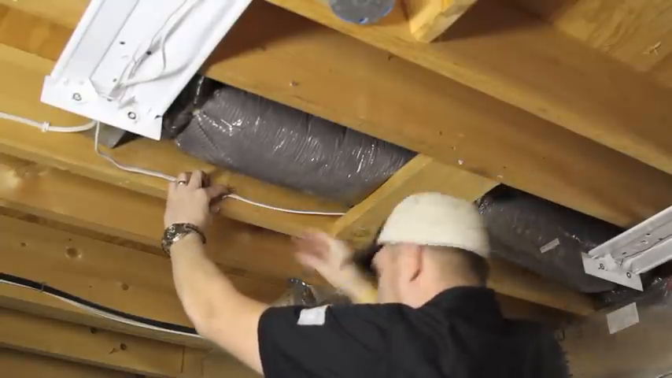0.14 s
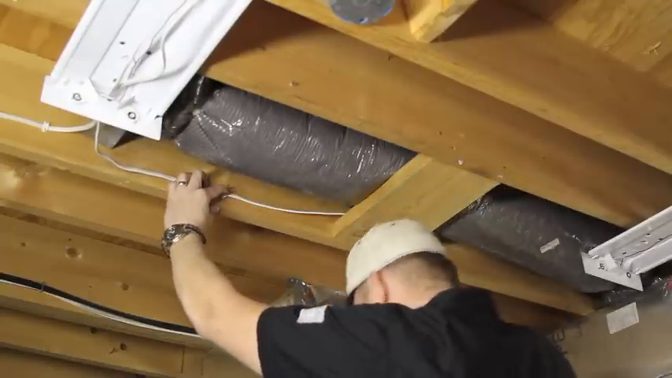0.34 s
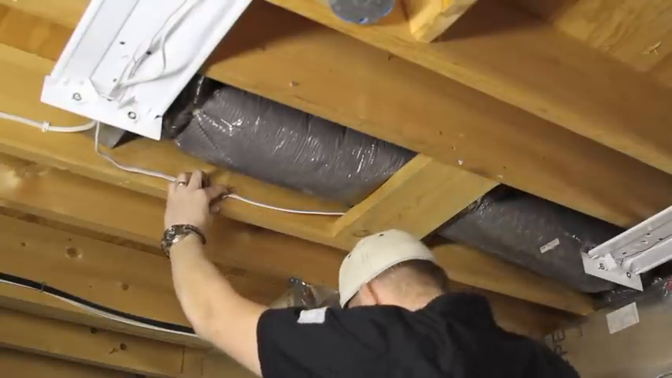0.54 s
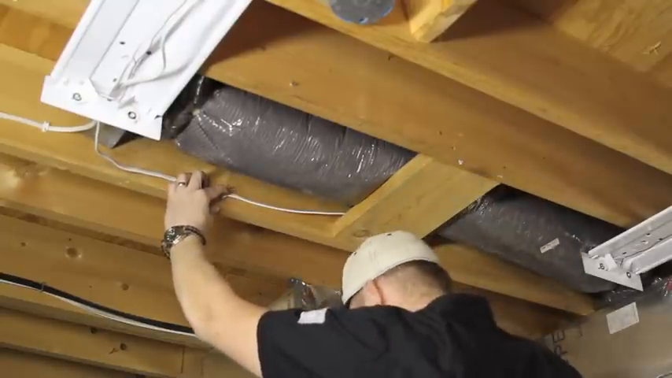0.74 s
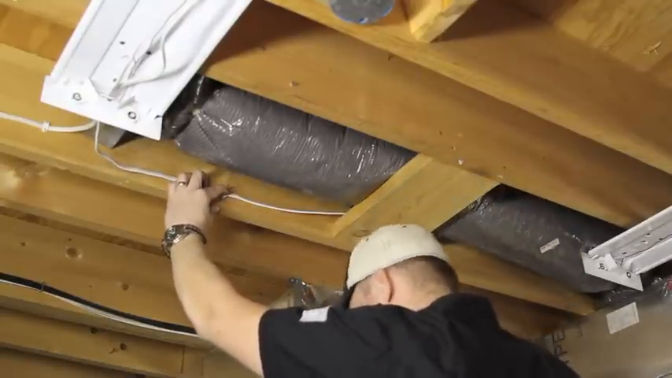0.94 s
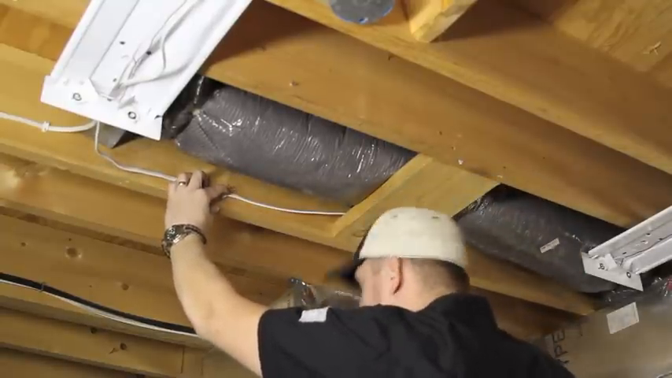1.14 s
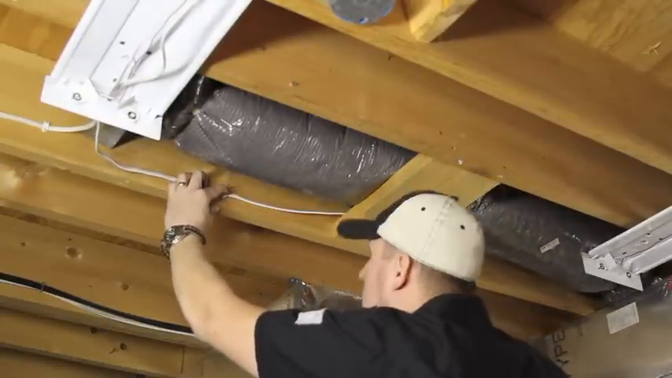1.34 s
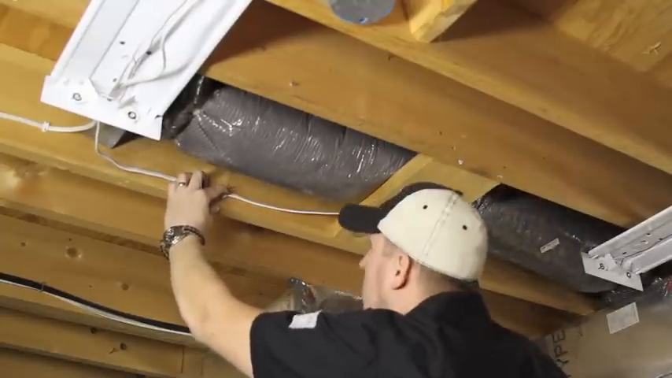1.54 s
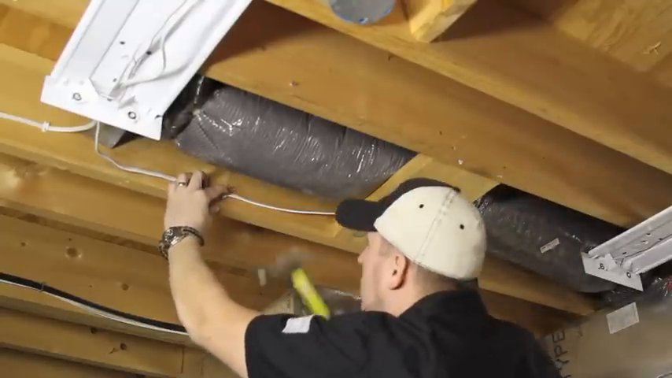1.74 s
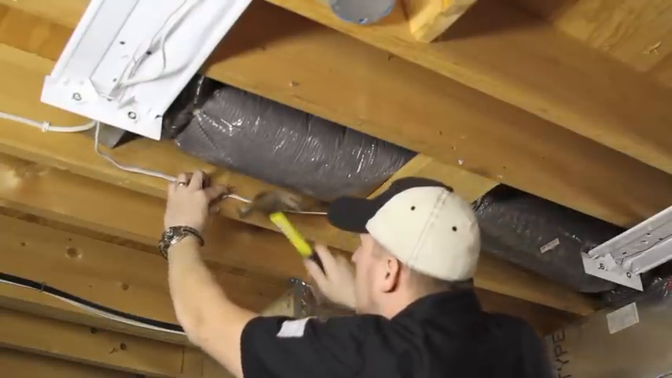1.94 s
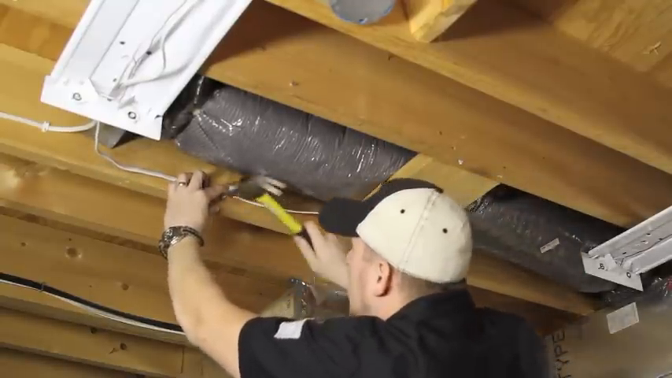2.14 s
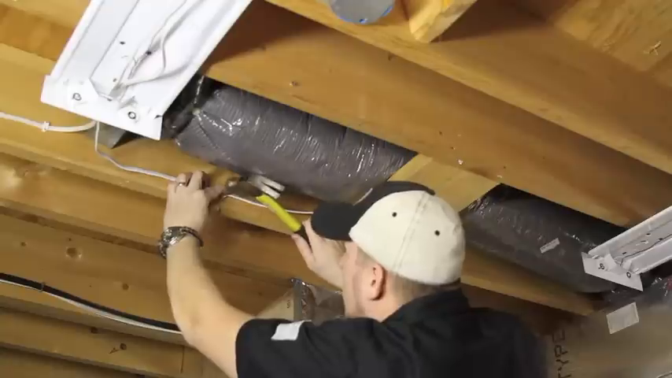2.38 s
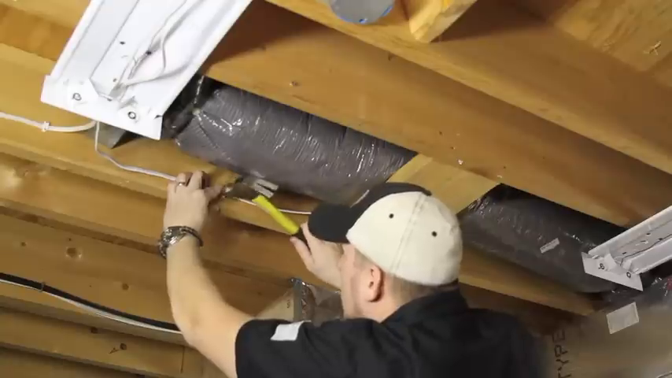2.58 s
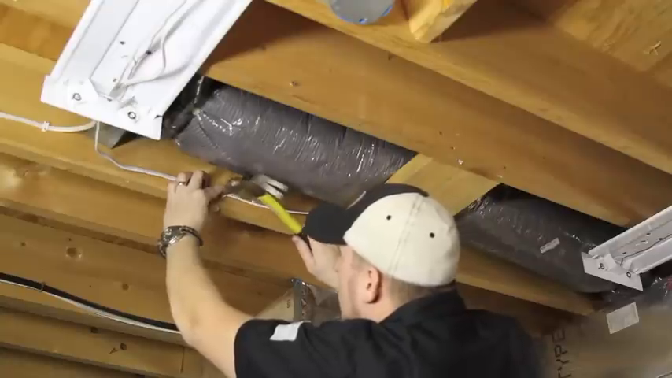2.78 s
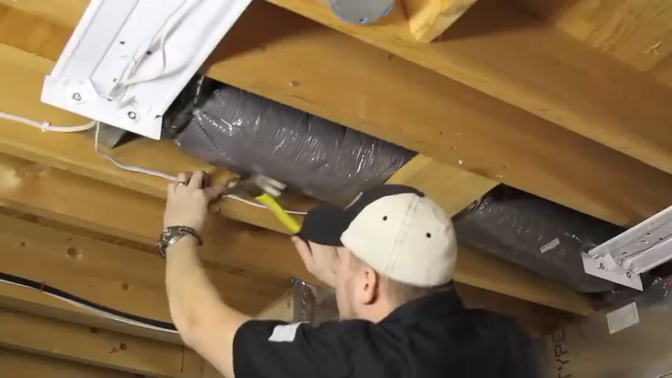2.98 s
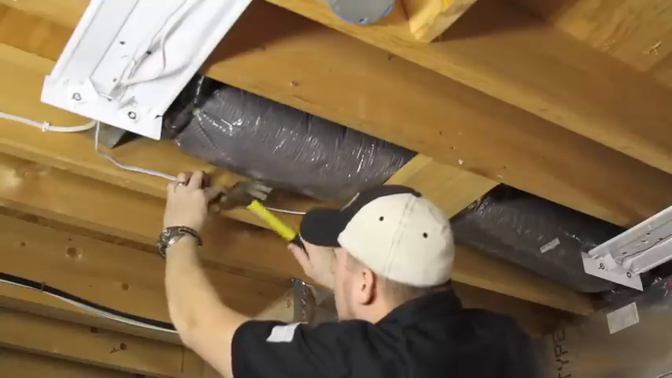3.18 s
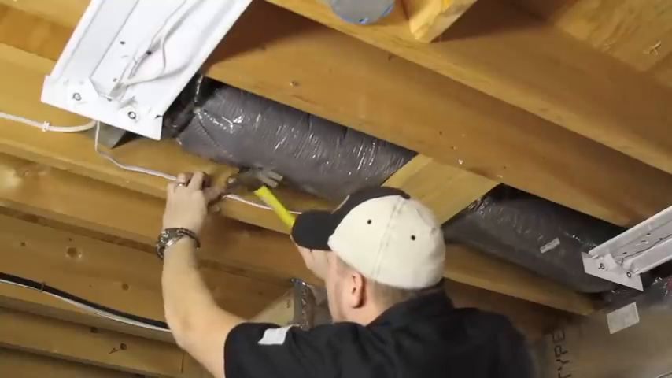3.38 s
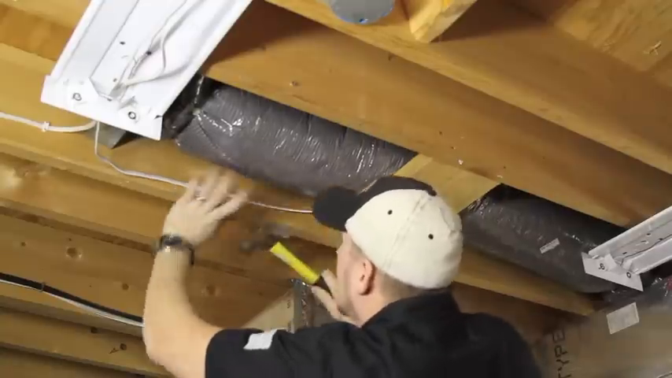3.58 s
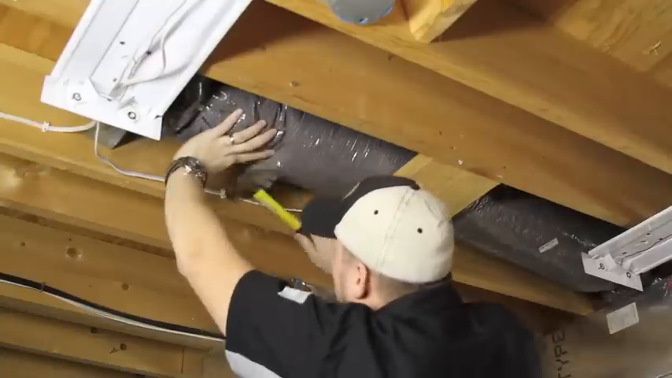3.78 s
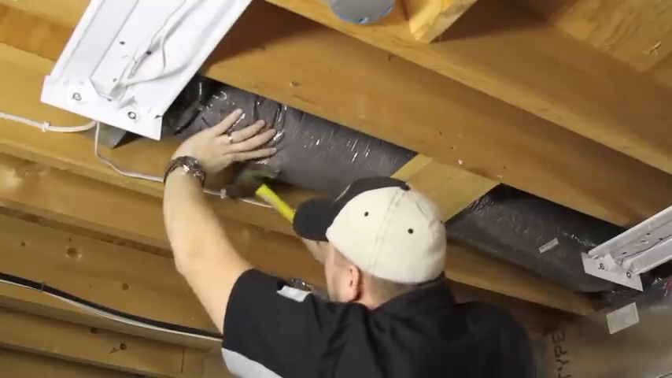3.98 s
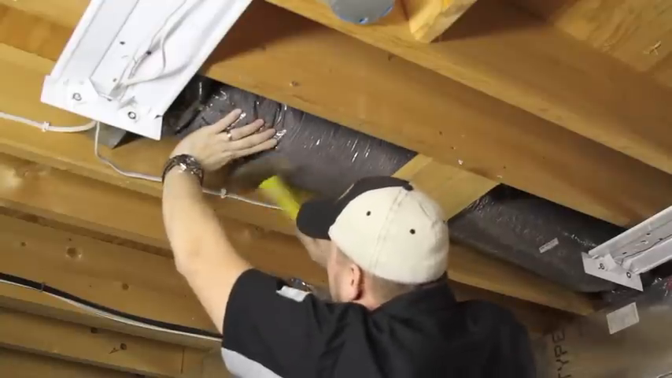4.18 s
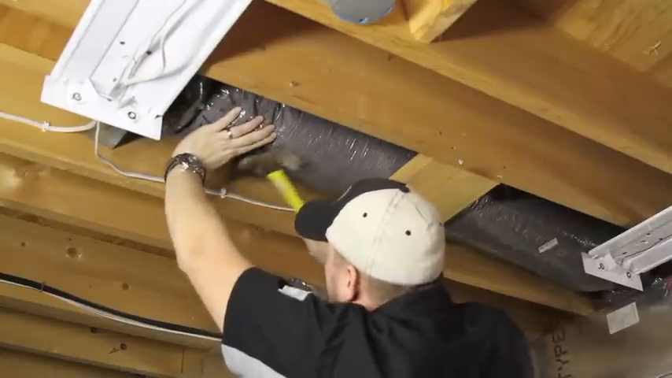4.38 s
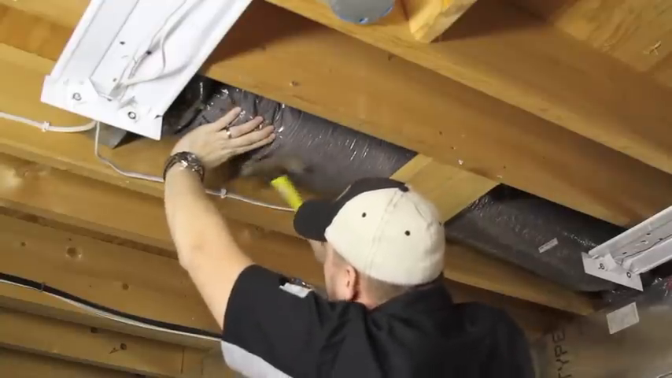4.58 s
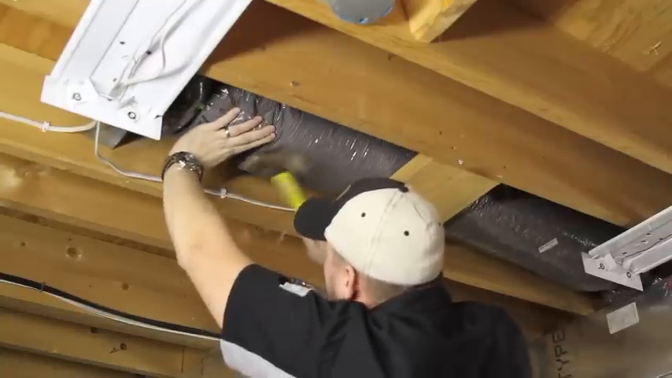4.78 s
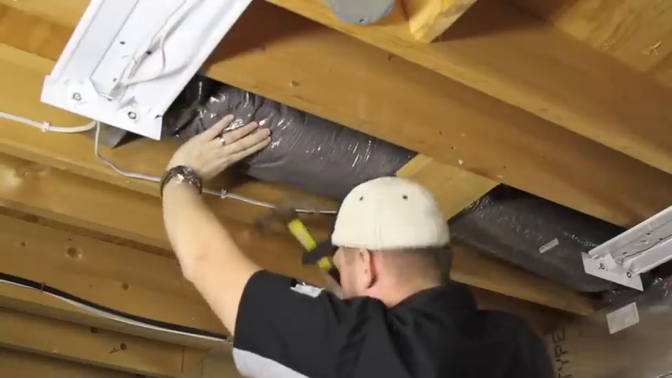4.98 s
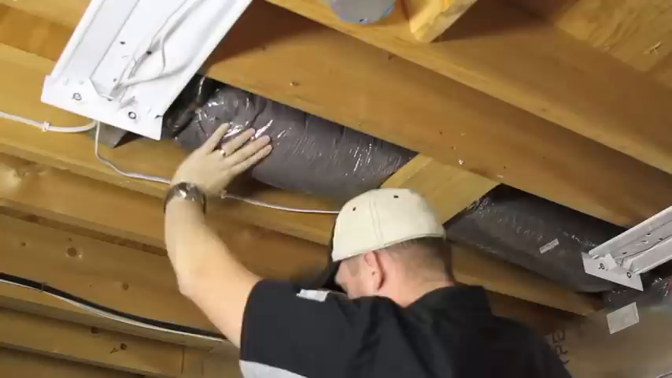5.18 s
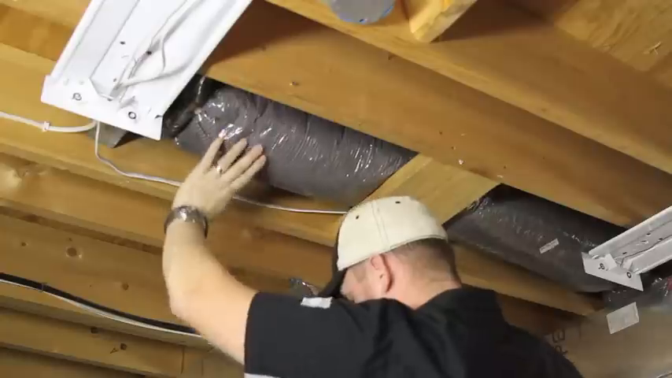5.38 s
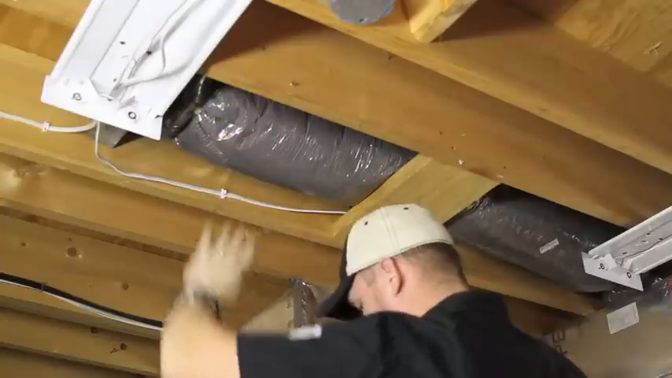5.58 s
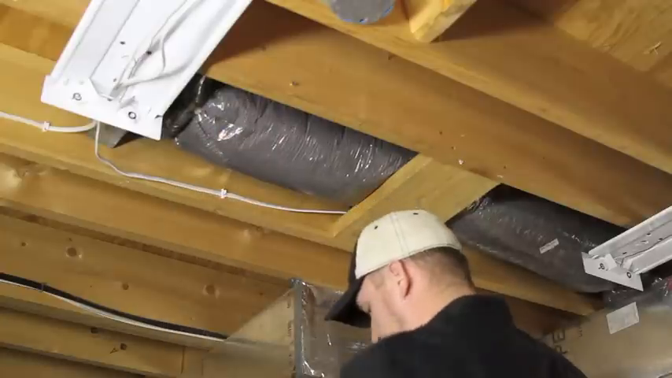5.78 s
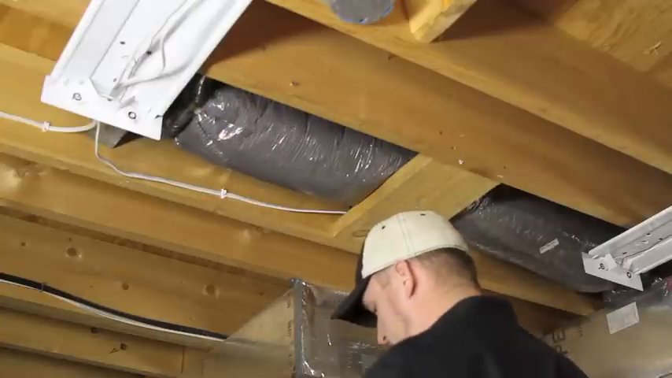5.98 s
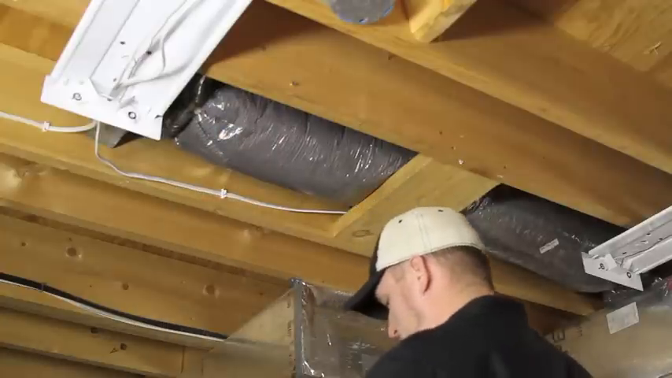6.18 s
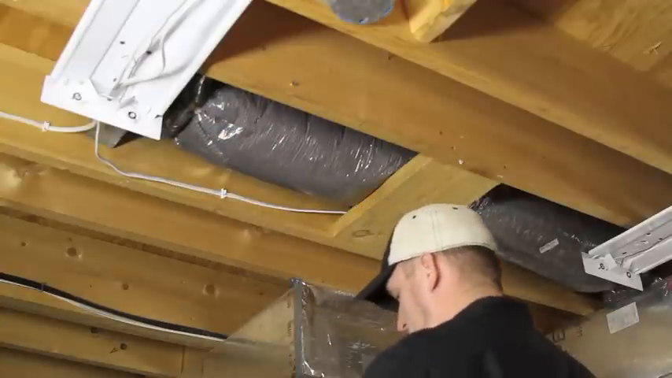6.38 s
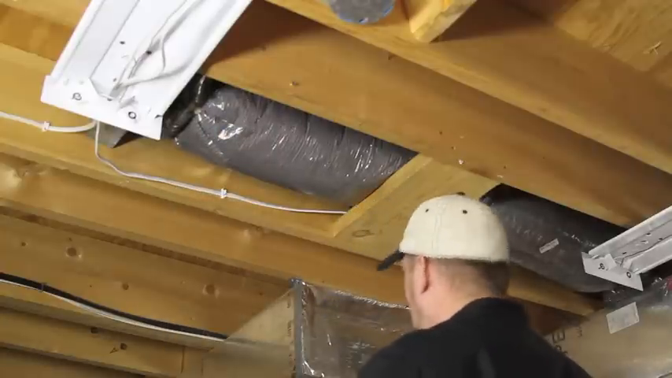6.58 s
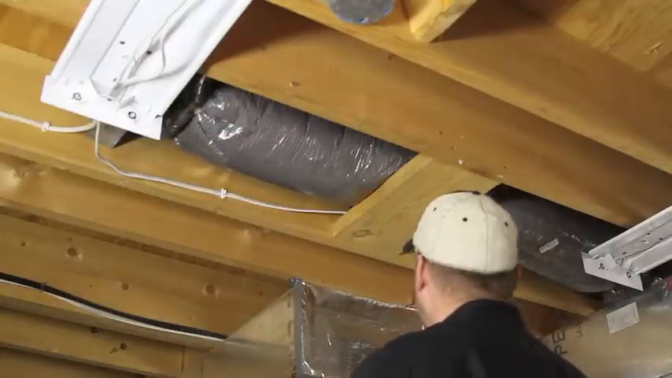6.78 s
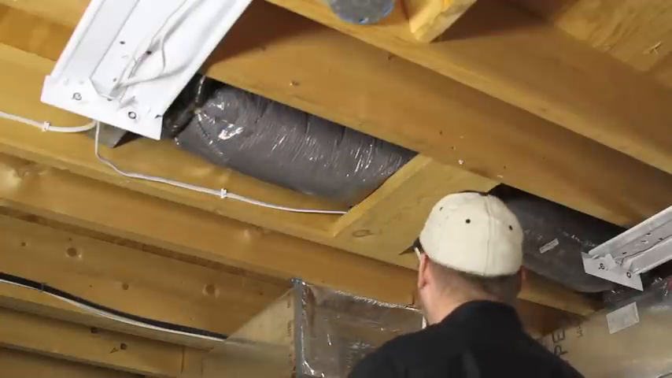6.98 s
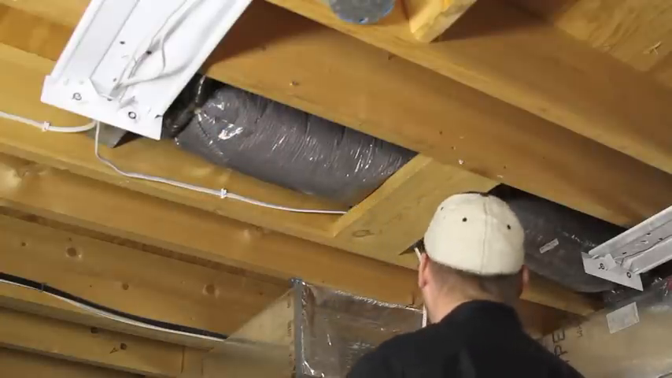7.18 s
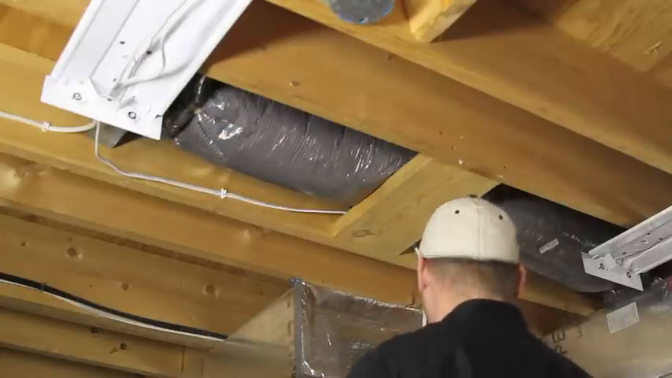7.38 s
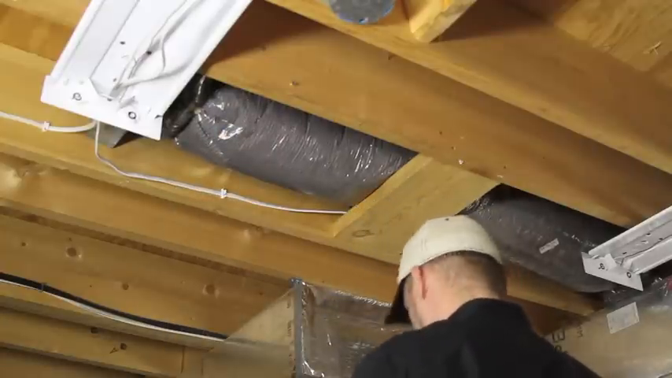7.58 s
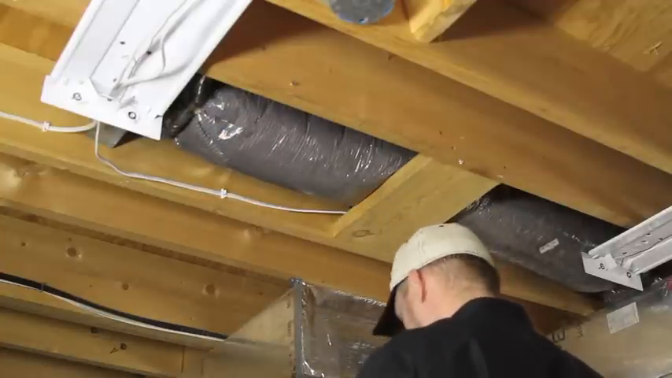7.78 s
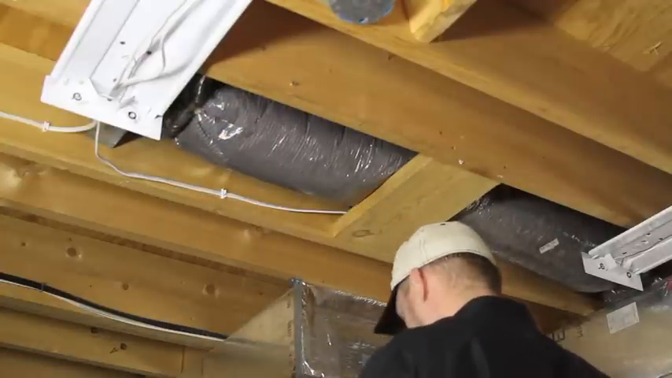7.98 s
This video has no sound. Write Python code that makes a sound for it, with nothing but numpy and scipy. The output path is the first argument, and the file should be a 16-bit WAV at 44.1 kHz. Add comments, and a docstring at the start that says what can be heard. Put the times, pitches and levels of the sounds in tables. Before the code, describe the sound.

Close-to-medium pickup in an unfinished basement with soft ventilation. Three solid hammer knocks with a steel snap, about a third of a second apart, turn into a rattling run of thin, sped-up taps with a short gap early on. Normal air returns, ducked at first, with slight creaks and foil rustle. A hammer drops onto a ladder top in a quick double clack, the ladder rattles, and small clicks and scrapes remain.

```python
"""A hammer drives a cable staple into a basement ceiling joist: three blows, then a faster, higher time-lapse run.
Each blow is damped joist modes, board noise, room echo, a steel snap and a hum of the floor above.
The hammer clanks onto a stepladder: noise knocks and a steel ring. The ladder scrapes, creaks and rocks in
resonant noise and wavering tones. Sleeve and foil rustle as noise strokes and grains; sped-up room tone fills
the run. Ventilation is noise: air rush, fan resonances and hiss."""
import sys
import numpy as np
from scipy.fft import rfft, irfft, next_fast_len
from scipy.io import wavfile
from scipy.ndimage import map_coordinates

SR = 44100
rng = np.random.default_rng(int(sys.argv[2]) if len(sys.argv) > 2 else 0)


def log_audio(samples):
    """Write samples as a 16-bit WAV file to the path given in sys.argv[1]."""
    # one column per channel
    frames = np.atleast_2d(samples).T
    # limit to full scale, then quantise
    limited = np.clip(frames, -1, 1)
    pcm = np.round(limited * 32767).astype(np.int16)
    wavfile.write(sys.argv[1], SR, pcm)


N = 354563  # samples
TOP_HZ = 16000


def amp(db):
    """Decibels to gain."""
    return 10 ** (np.asarray(db) / 20)


def unit(x):
    """Scale to rms 1."""
    return x / np.sqrt(np.mean(x ** 2) + 1e-20)


def along(points, hz):
    """Read (freq_hz, value) points on a log axis."""
    f, v = np.transpose(points)
    return np.interp(np.log(hz + 1), np.log(f + 1), v)


def level(rows, peak_share, curve):
    """Gain per sample for (start_s, length_s, level_db) strokes: each swells and dies away."""
    t = np.arange(N) / SR
    stages = np.array([0, np.clip(peak_share, .05, .95), 1])
    gain = 0
    for start_s, length_s, level_db in rows:
        swell = np.interp(t, start_s + length_s * stages, [0, 1, 0])
        gain = gain + amp(level_db) * swell ** abs(curve)
    return gain


def filtered(x, response):
    """Multiply the spectrum of x by a response of frequency."""
    m = next_fast_len(len(x) + 8192)
    return irfft(rfft(x, m) * response(np.fft.rfftfreq(m, 1 / SR)), m)[:len(x)]


def noise(spectrum, size=N, speed=1):
    """Noise of rms 1 with a spectrum that speed shifts upward."""
    return unit(filtered(rng.standard_normal(size), lambda hz: amp(along(spectrum, hz / speed))))


def resonant_noise(peaks):
    """Noise of rms 1 ringing in resonances of alternating sign."""
    def body(f):
        total = 0
        for k, (centre, width, db) in enumerate(peaks):
            resonance = 1j * f * width / (centre * centre - f * f + 1j * f * width)
            total = total + (-1) ** k * amp(db) * resonance
        return total

    # the extra power sharpens the peaks
    return unit(filtered(rng.standard_normal(N), lambda f: body(f) * np.abs(body(f)) ** (1 / 4)))


def ripple(x, spacing_hz, depth_db):
    """Reflections leave irregular peaks and dips across the spectrum."""
    knots = rng.standard_normal(int(SR / spacing_hz))
    return filtered(x, lambda hz: amp(depth_db * map_coordinates(knots, [hz / spacing_hz])))


def ring(modes, t, scatter_db):
    """Damped modes that start together, their strengths scattered by scatter_db."""
    total = 0
    for hz, db, t60_s in modes:
        decay = amp(db + scatter_db * rng.standard_normal() - 60 * t / t60_s)
        total = total + decay * np.sin(2 * np.pi * hz * t)
    return total


def add(track, s, sound):
    """Mix a sound in at time s."""
    start = round(s * SR)
    track[start:start + len(sound)] += sound[:N - start]


# room decay, at speed 1: freq_hz, t60_s
ROOM_DECAY = [(100, 0.73), (250, 0.45), (600, 0.39), (2000, 0.3), (6000, 0.41), (15000, 0.15)]


def reverberant(spectrum, t, speed=1):
    """Diffuse sound whose every band dies at the room's own rate."""
    source = noise(spectrum, size=len(t), speed=speed)
    centres = [hz for hz, _ in ROOM_DECAY]
    total = 0
    for share, (_, t60_s) in zip(np.eye(len(ROOM_DECAY)), ROOM_DECAY):
        points = list(zip(centres, share))
        band = filtered(source, lambda hz: along(points, hz / speed))
        total = total + band * amp(-60 * t / t60_s)
    return total


# joist with its staple, at speed 1: freq_hz, level_db (relative), t60_s
JOIST_MODES = [(115.1, -32, 1), (141.5, -29, 0.69), (189.3, -10, 0.12), (230.3, -11.5, 0.29),
               (323, -21, 0.35), (359, -5.5, 0.065), (389, -7.5, 0.11), (561.3, -1.5, 0.079),
               (606, 1, 0.035), (624, -2.5, 0.073), (844, -17, 0.082), (1082, -11, 0.06),
               (1275, -16.5, 0.087), (1782, -17, 0.083), (2880, -12, 0.05)]
# ceiling boards, at speed 1: freq_hz, level_db (relative, per Hz)
BOARD_SPECTRUM = [(30, -27.5), (62, -9), (95, -13), (140, -5), (230, 2.5), (450, -6.5), (580, -1),
                  (780, -14.5), (1200, -11.5), (1750, -15), (2300, -20), (2900, -17.5), (4500, -25.5),
                  (8500, -35), (16000, -21.5)]
# steel on steel, at speed 1: freq_hz, level_db (relative, per Hz)
STAPLE_SPECTRUM = [(300, -15), (1200, 4), (4000, 1), (9000, -6), (13500, 4), (16000, -3.5)]
# hum of the floor above, at speed 1: freq_hz, level_db (relative, per Hz)
FLOOR_HUM_SPECTRUM = [(45, -52), (60, -15), (85, -31), (105, -20.5), (122, -1.5), (140, 0), (165, -15),
                      (300, -71)]
FLOOR_T60_S = 0.85  # at speed 1


def hammering(rows, speed, boards_db, boards_t60_s, room_db, steel_db, steel_t60_s, rise_s,
              spot_hz, spot_db, boom_db, body_db, hum_db):
    """Each blow rings the joist, shakes the boards and fills the room; speed scales time and pitch."""
    t = np.arange(int(SR / speed)) * speed / SR  # unscaled time: t60 and rise settings refer to it

    def boards():
        direct = amp(boards_db - 60 * t / boards_t60_s) * noise(BOARD_SPECTRUM, len(t), speed)
        return direct + amp(room_db) * reverberant(BOARD_SPECTRUM, t, speed)

    modes = [mode for mode in JOIST_MODES if mode[0] * speed < TOP_HZ]
    shared = boards()  # part of the echo is common to all these blows
    track = np.zeros(N)
    for s, db, thud_db, crack_db in rows:
        joist = ring(modes, t * (1 + 0.011 * rng.standard_normal()), scatter_db=2)
        wood = (joist + shared / 2 + boards() * np.sqrt(3) / 2) * (1 - np.exp(-t / rise_s))
        # the snap has no onset ramp, so it leads the wood
        snap = amp(steel_db - 60 * t / steel_t60_s) * noise(STAPLE_SPECTRUM, len(t), speed)
        colour = [(130, thud_db / 2 + boom_db), (200, thud_db + body_db), (280, thud_db + body_db),
                  (480, 0.0043), (700, 0), (950, crack_db), (5000, crack_db), (11000, 0)]
        blow = filtered(wood + snap, lambda hz: amp(along(colour, hz / speed)))
        blow = ripple(blow, spot_hz, spot_db)  # no two blows land on quite the same spot
        blow = blow / np.sqrt(np.mean(blow[t < 1 / 50] ** 2))
        hum = amp(hum_db - 60 * t / FLOOR_T60_S) * noise(FLOOR_HUM_SPECTRUM, len(t), speed)
        hum = hum * (1 - np.exp(-t / 0.035))
        add(track, s, amp(db) * (blow + hum))
    return track


# first blows: start_s, level_db, thud_db, crack_db
FIRST_BLOWS = [(2.5609, -16.0, 2, -4), (2.8829, -12, 0.5, 0.5), (3.169, -12.0, 2.5, 3.5)]


def first_blows():
    """Three blows of hammer on staple, near natural speed."""
    return hammering(FIRST_BLOWS, 0.97, boards_db=-4.5, boards_t60_s=0.071, room_db=-15,
                     steel_db=-4.5, steel_t60_s=0.022, rise_s=0.0031, spot_hz=110.6, spot_db=1.5,
                     boom_db=-0.5, body_db=-2, hum_db=-19.0)


# time-lapse blows: start_s, level_db (relative within the run), crack_db
LAPSE_BLOWS = [(3.3006, -19.5, -4), (3.3329, -13.5, 4.5), (3.3644, -14, 4), (3.399, -13.5, 6),
               (3.4378, -14.5, 5), (3.5057, -7.5, 1), (3.5548, -6, 0.5), (3.8139, -7, 3),
               (3.8577, -9.5, 2.5), (3.9046, -9, 1), (3.9465, -10, 1.5), (3.9888, -9, 9),
               (4.0499, -10, 5.5), (4.0916, -10, 3.5), (4.1338, -11, -3), (4.1777, -11, 7.5),
               (4.2247, -11, 1.5), (4.2634, -12, 1.5), (4.3005, -11, 0.5), (4.3377, -9.5, 2),
               (4.3747, -10, 1), (4.4379, -40, 16), (4.4651, -12.5, 2), (4.5102, -12.5, 1.5),
               (4.5546, -13, 5), (4.5973, -13, 6), (4.642, -11, 5.5), (4.6878, -10, 3), (4.7323, -12, 0),
               (4.7755, -14.5, 4.5), (4.8173, -9.5, -3.5), (4.8658, -14.5, 2), (4.9107, -20.5, 3.5),
               (4.9572, -32.5, 2)]
LAPSE_SPEED = 7.6
LAPSE_START_S, LAPSE_END_S = 3.265, 4.968


def lapse_blows():
    """The same wood and steel, with time shortened and pitch raised by the time-lapse."""
    run = hammering(seated(LAPSE_BLOWS), LAPSE_SPEED, boards_db=4.5, boards_t60_s=0.023, room_db=-13,
                    steel_db=-6, steel_t60_s=0.01, rise_s=0.0037, spot_hz=205, spot_db=1.3,
                    boom_db=-7, body_db=2.5, hum_db=-22)
    return amp(1.5) * run


PAUSE_S = 0.055  # a longer gap starts a new burst
THUD_LOOSE_DB, THUD_SEATED_DB, SEATING_BLOWS = 0.5, -8, 2.57  # first blow, limit, decay in blows


def seated(rows):
    """Give each blow its thud: full after a pause, thinner as the staple is driven home."""
    blows, previous, driven = [], -np.inf, 0
    for s, db, crack_db in rows:
        driven = 0 if s - previous > PAUSE_S else driven + 1
        thud_db = THUD_SEATED_DB + (THUD_LOOSE_DB - THUD_SEATED_DB) * np.exp(-driven / SEATING_BLOWS)
        blows.append((s, db, thud_db, crack_db))
        previous = s
    return blows


# hammer contacts with the ladder: start_s, level_db, steel_db (relative to the contact)
CLANK_CONTACTS = [(6.037, -18.5, -34), (6.043, -10.5, -20), (6.049, -27, -19), (6.061, -40, -11.5),
                  (6.070, -20, -28)]
# ladder knock: freq_hz, level_db (relative, per Hz)
KNOCK_SPECTRUM = [(47, -64), (80, -43), (259, 0.5), (323, -13), (353, -1.5), (504, -6.5), (734, -4.5),
                  (1370, 1.5), (1900, -8.5), (4330, -14.5), (6890, -26.5), (7870, -26.5), (8410, -25),
                  (8990, -25.5), (16000, -53)]
# hammer head: freq_hz, level_db (relative), t60_s
STEEL_MODES = [(8000, 3.5, 0.15), (8900, 1, 0.17), (11900, -6, 0.197)]


def clank():
    """The hammer clatters onto the ladder top and its head rings."""
    t, track = np.arange(SR // 2) / SR, np.zeros(N)
    for s, db, steel_db in CLANK_CONTACTS:
        knock = noise(KNOCK_SPECTRUM, size=len(t)) * amp(-60 * t / 0.14)
        knock = knock + amp(-6.5) * reverberant(KNOCK_SPECTRUM, t)
        steel = ring(STEEL_MODES, t * (1 + .003 * rng.standard_normal()), scatter_db=0.0)
        onset = 1 - np.exp(-t / 0.0019)
        add(track, s, amp(db) * (knock + amp(steel_db) * steel) * onset)
    return track


# rubbing strokes: start_s, length_s, level_db
SCRAPE_STROKES = [(2.7, 0.064, -38.5), (3.02, 0.062, -41), (5.0, 0.57, -47.5), (5.37, 0.34, -41.5),
                  (5.66, 0.082, -45.5), (6.32, 0.14, -46), (6.5, 0.13, -46), (7.665, 0.068, -42.5),
                  (7.775, 0.09, -41), (7.972, 0.055, -36), (8.0, 0.1, -32)]
# ladder resonances before load bends them: freq_hz, width_hz, level_db (relative, before sharpening)
FRAME_PEAKS = [(408, 17, -2), (740, 46, -7.5), (867, 27, 1.5), (1054, 113, 0), (1430, 180, 2),
               (1890, 260, -2.5), (2800, 1240, -7)]
# handling clicks: start_s, level_db, t60_s
HANDLING_TICKS = [(6.741, -37.5, 0.06), (7.262, -42, 0.022)]


def ladder():
    """Shifting weight scrapes the frame, makes it creak and rock; small things click."""
    grip = amp(1.2 * noise([(25, -1.0), (60, -13.0), (150, -56), (400, -120)]))  # friction catches unevenly
    load = 1 + .02 * noise([(4, 0.5), (8, -21), (30, -120)])  # changing load bends the resonances
    frame = map_coordinates(resonant_noise(FRAME_PEAKS), [np.cumsum(load)], mode="mirror")
    scrape = level(SCRAPE_STROKES, peak_share=0.47, curve=0.75) * unit(grip * frame)
    rock = rocking() * noise([(110, -43.5), (190, -2), (330, 5), (450, -7), (900, -56.5)])
    track = scrape + creaks() + rock
    t = np.arange(SR // 8) / SR
    for s, db, t60_s in HANDLING_TICKS:
        tick = noise([(1500, -4), (3000, 8.0), (5500, -1), (8000, -24.0)], size=len(t))
        add(track, s, amp(db - 60 * t / t60_s) * tick)
    return track


# frame creaks under load: start_s, length_s, level_db, pitch_hz (mean)
FRAME_CREAKS = [(5.16, 0.12, -54, 1405), (5.252, 0.11, -52, 415), (5.41, 0.21, -44, 1415),
                (5.44, 0.14, -48, 414)]
CREAK_WAVER = 0.0252  # rms share of the pitch


def creaks():
    """Each creak is a stick-slip tone whose pitch wavers."""
    track = np.zeros(N)
    for s, length_s, db, hz in FRAME_CREAKS:
        pitch_hz = hz * (1 + CREAK_WAVER * noise([(40, 4.5), (150, -40), (400, -120)]))
        tone = unit(np.sin(2 * np.pi * np.cumsum(pitch_hz) / SR))
        track += level([(s, length_s, db)], peak_share=0.42, curve=0.8) * tone
    return track


ROCK_DB, ROCK_BUILD_S, ROCK_FADE_DB_PER_S, ROCK_HZ = -47, 0.23, 14, 8.2


def rocking():
    """Gain of the ladder's rattle: it builds after the clank, pulses and fades."""
    age = np.arange(N) / SR - CLANK_CONTACTS[0][0]
    build = np.clip(age / ROCK_BUILD_S, 0, 1) ** 2
    settled = age - ROCK_BUILD_S
    pulse_db = 3.8 * np.sin(-2 * np.pi * ROCK_HZ * age)
    return build * amp(ROCK_DB - ROCK_FADE_DB_PER_S * settled + pulse_db)


# sleeve cloth: freq_hz, level_db (relative, per Hz)
CLOTH_SPECTRUM = [(500, -13.5), (1200, -0.5), (2800, 4.5), (6000, -0.5), (9000, -2), (12000, 4.5),
                  (16000, -7)]
REACH_S, REACH_LENGTH_S, REACH_DB = 2.06, 0.26, -44.5  # the hammer is raised
SWING_LEAD_S, SWING_LENGTH_S, SWING_DB = 0.12, 0.23, -39
RECOIL_LAG_S, RECOIL_LENGTH_S, RECOIL_DB = 0.08, 0.15, -44.5


def sleeve():
    """The sleeve swishes as the arm rises, then into and back out of each of the first blows."""
    strokes = [(REACH_S, REACH_LENGTH_S, REACH_DB)]
    for s, *_ in FIRST_BLOWS:
        strokes.append((s - SWING_LEAD_S, SWING_LENGTH_S, SWING_DB))
        strokes.append((s + RECOIL_LAG_S, RECOIL_LENGTH_S, RECOIL_DB))
    return level(strokes, peak_share=0.42, curve=0.69) * noise(CLOTH_SPECTRUM)


def foil(start_s, end_s, count, db):
    """The hand resting on the flexible duct crinkles its foil: short random noise grains."""
    track = np.zeros(N)
    for when, size in rng.random((count, 2)):
        grain = np.hanning(SR // 250) * rng.standard_normal(SR // 250)
        add(track, start_s + when * (end_s - start_s), amp(db) * size * grain)
    return filtered(track, lambda hz: hz / (hz + 6000))


# sped-up room tone and rustle, as heard: freq_hz, level_db (relative, per Hz)
LAPSE_SPECTRUM = [(120, -81), (200, -70), (330, -32), (385, -6.5), (450, -19), (560, -27.5), (968, -21),
                  (1080, -14.5), (1910, -7.5), (2130, -15), (3250, -8.5), (6640, -11.5), (11100, -13),
                  (16000, -15.5)]
# sped-up rustles of handling: start_s, length_s, level_db
LAPSE_RUSTLES = [(3.4, 0.65, -44), (4.48, 0.25, -57.5)]
LAPSE_TONE_DB = -56


def lapse_air():
    """Sped-up room tone and rustle fill the gaps of the run."""
    t = np.arange(N) / SR
    inside = np.clip(np.minimum(t - LAPSE_START_S, LAPSE_END_S - t) / 0.06, 0, 1)
    gain = amp(LAPSE_TONE_DB) + level(LAPSE_RUSTLES, peak_share=0.45, curve=0.46)
    return inside * gain * noise(LAPSE_SPECTRUM)


# air in the ducts: freq_hz, level_db (relative, per Hz)
DUCT_SPECTRUM = [(25, -16.5), (48, -8), (80, -13), (135, -11), (180, -2), (240, -5), (400, -4), (730, -7),
                 (850, -10), (1100, -14), (1400, -7.5), (1900, -10), (2350, -10.5), (3000, -20.5),
                 (6000, -35)]
# fan resonances: freq_hz, width_hz, level_db (relative, before sharpening)
FAN_PEAKS = [(236.2, 8.8, 0), (514, 9.3, -2.5), (612, 12.4, 0), (696.7, 23, -0.5), (747, 17.3, 0.5),
             (2103, 32, -4), (2166, 22, -6), (2366, 17, -2.5)]
# fine hiss: freq_hz, level_db (relative, per Hz)
HISS_SPECTRUM = [(1800, -24), (2700, -3), (3600, 0), (5300, -7), (6200, -2), (7300, -4), (10500, -6),
                 (12900, 3.5), (16000, -11)]
# the background sinks and creeps back: start_s, depth_db, recovery_s
LEVEL_DIPS = [(2.89, 4, 1.5), (4.968, 10.5, 1.08), (6.05, 2, 5.9)]
RUSH_DB, HISS_DB = -47.5, -47.5  # before the dips


def ventilation():
    """Air rushes in the ducts, with narrow fan resonances and a fine hiss."""
    t = np.arange(N) / SR
    rush = noise(DUCT_SPECTRUM) + amp(-1.5) * resonant_noise(FAN_PEAKS)
    hiss = unit(ripple(noise(HISS_SPECTRUM), spacing_hz=70.16, depth_db=4.5))
    dip_db = 0
    for s, depth_db, recovery_s in LEVEL_DIPS:
        dip_db = dip_db + np.interp(t, [s, s + recovery_s], [depth_db, 0], left=0)
    return amp(-dip_db) * (amp(RUSH_DB) * rush + amp(HISS_DB) * hiss)


def scene():
    """Normal time fades out around the time-lapse run."""
    t = np.arange(N) / SR
    blows = first_blows()
    run = lapse_blows()
    crinkle = foil(start_s=5.09, end_s=5.4, count=12, db=-33.5)
    normal = blows + clank() + ladder() + crinkle + ventilation() + sleeve()
    fade = np.clip(np.maximum(LAPSE_START_S - t, t - LAPSE_END_S) / 0.075, 0, 1)
    return (fade * normal + run + lapse_air())[None]


def record(dry):
    """The loudest peaks are rounded off; then everything above TOP_HZ is removed."""
    rounded = dry / (1 + np.abs(dry / .95) ** 6) ** (1 / 6)
    return filtered(rounded[0], lambda hz: hz < TOP_HZ)[None]


dry = scene()
out = record(dry)
log_audio(out)
```